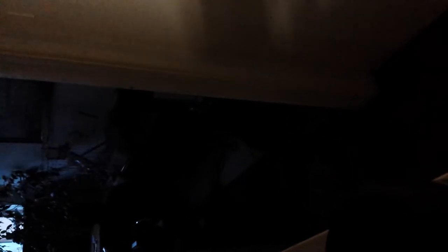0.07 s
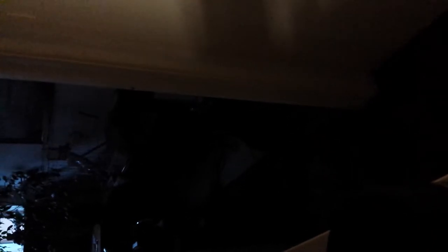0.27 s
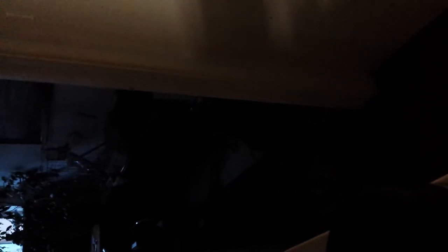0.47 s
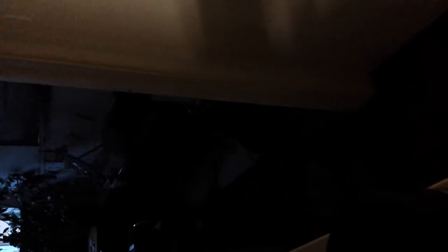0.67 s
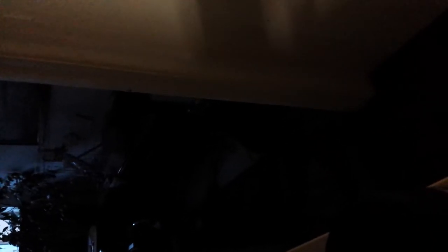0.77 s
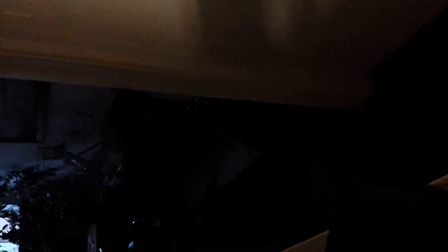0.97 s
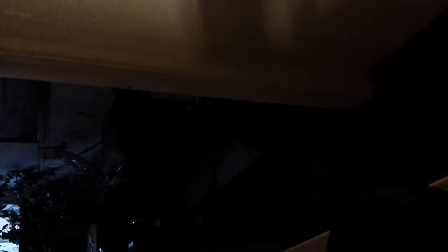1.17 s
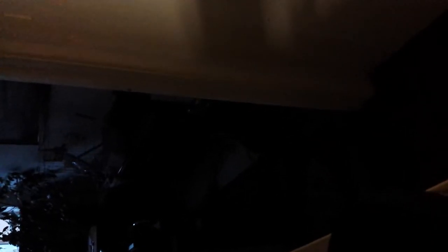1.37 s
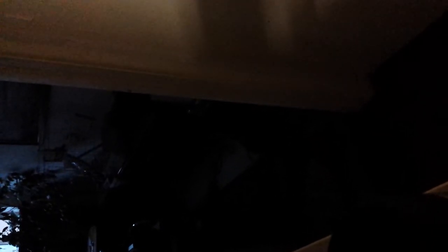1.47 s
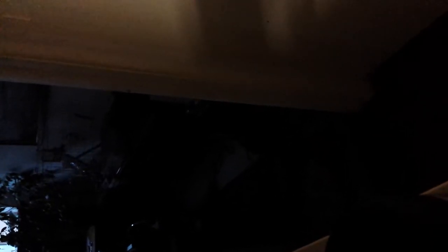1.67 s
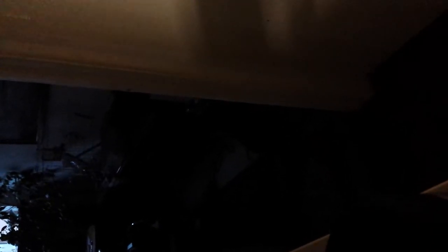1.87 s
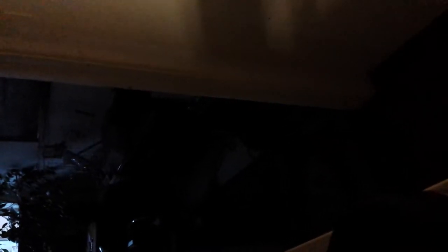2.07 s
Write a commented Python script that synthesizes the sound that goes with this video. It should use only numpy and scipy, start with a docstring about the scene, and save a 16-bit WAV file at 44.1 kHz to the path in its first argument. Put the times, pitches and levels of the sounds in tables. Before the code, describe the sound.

A dog whimpers briefly, whistles thinly through its nose, then whines in a long rising cry

```python
"""Dog whining in a small room

A short whimper, thin nasal whistles, then a long cry: rough at first under the loudest whistle, it sags
in pitch and clears into an almost pure rising tone. Harmonic sines and pulsed noise form the voice,
wavering sines and airy noise the whistles. Wall reflections make the tones flutter; beneath lie
shaped-noise rumble and hiss, a faint hum of two sines and two soft knocks of decaying noise."""
import sys
import numpy as np
from scipy import signal
from scipy.fft import rfft, irfft, next_fast_len
from scipy.io import wavfile

SR = 44100
rng = np.random.default_rng(int(sys.argv[2]) if len(sys.argv) > 2 else 0)


def wrap_up_sound(samples):
    """Save the sound to the file named by the first command line argument, as 16-bit audio."""
    columns = np.atleast_2d(samples).T
    # keep every value between -1 and 1, then stretch to whole-number steps
    tamed = np.clip(columns, -1, 1)
    steps = np.round(tamed * 32767).astype(np.int16)
    wavfile.write(sys.argv[1], SR, steps)


N = 93227  # length [samples]


def from_db(db):
    """Logarithmic level: 20 dB is a factor of ten in amplitude."""
    return 10 ** (np.asarray(db) / 20)


def rms_one(x):
    """Normalization by the root mean square, to rms 1."""
    return x / np.sqrt(np.mean(x ** 2) + 1e-20)


def in_time(rows):
    """Linear interpolation of each column of a time curve at every sample."""
    s, *columns = np.transpose(rows)
    return [np.interp(np.arange(N) / SR, s, c) for c in columns]


def gate(rows):
    """Amplitude window: open from the first to the last row, with linear fades just outside."""
    fade_s = 0.008
    t = np.arange(N) / SR
    inside = np.minimum(t - rows[0][0], rows[-1][0] - t)
    return np.clip(1 + inside / fade_s, 0, 1)


def at_hz(points, hz):
    """Spectral envelope: gain at these frequencies, interpolated in dB over log frequency."""
    f, db = np.transpose(points)
    return from_db(np.interp(np.log(hz + 1), np.log(f), db))


def drift(hz):
    """Low-pass random process: a wander of rms 1 that weakens steeply above this rate."""
    f = np.arange(N + 1) * SR / (2 * N)
    spectrum = rfft(rng.standard_normal(2 * N)) / (1 + (f / hz) ** 2) ** 2
    return rms_one(irfft(spectrum)[:N])


def noise(spectrum, alike):
    """Coloured noise by spectral shaping; mid and side powers set the left-right correlation."""
    size = next_fast_len(N, True)
    gain = at_hz(spectrum, np.fft.rfftfreq(size, 1 / SR))
    white = rng.standard_normal((2, size))
    mid, side = irfft(rfft(white) * gain, size)[:, :N]
    return rms_one(np.sqrt(1 + alike) * mid + np.sqrt(1 - alike) * side * [[1], [-1]])


def pan(x, db):
    """Interaural level difference: left raised and right lowered by db."""
    return x * from_db(db * np.array([[1], [-1]]))


def background():
    """Broadband room noise with a frequency- and amplitude-modulated hum, under slow level curves."""
    # Slow swell of the room noise: (time [s], rumble and hum level [dB], hiss level [dB])
    floor = [(0, -75.5, -73), (.1, -75, -73.5), (.25, -70.5, -63.5), (.38, -72, -72), (.95, -70, -68),
             (1.15, -65.5, -63), (1.27, -70.5, -67), (1.6, -63, -60), (1.95, -61.5, -59),
             (2.11, -61.5, -60)]
    # Spectra of the low and high room noise: (frequency [Hz], level [dB])
    rumble_spectrum = [(25, -10.5), (50, -2.5), (75, -2.5), (105, 3), (150, -3.5), (300, -6), (600, -8.5),
                       (1200, -16.5), (3000, -25.5)]
    hiss_spectrum = [(200, -10), (700, -5), (2000, 0), (4000, 0.5), (8000, -2), (11000, -5), (15500, -1.5)]
    # Hum tones: (frequency [Hz], peak amplitude relative to the rumble's rms [dB])
    hum_tones = [(106, -8), (199, -8)]
    hum_waver_hz, hum_swell = 2.5, 1.08  # rms deviation of pitch [Hz] and of relative amplitude

    rumble_db, hiss_db = in_time(floor)
    hum = 0
    for hz, db in hum_tones:
        phase = 2 * np.pi * np.cumsum(hz + hum_waver_hz * drift(23.7)) / SR
        hum = hum + from_db(db) * np.sin(phase) * (1 + hum_swell * drift(3.2))
    low = noise(rumble_spectrum, alike=0.21) + hum
    return from_db(rumble_db) * low + from_db(hiss_db) * noise(hiss_spectrum, alike=0.0045)


def room(x):
    """Recirculating reflections: each round trip forms a decaying echo series, weaker in the bass."""
    # Round trips between the walls [ms], one row each for left and right
    wall_trips = [
        [11.3, 15.9, 19.7, 22, 38, 35.9],
        [12.7, 17, 19, 24, 18, 33],
    ]
    reflection_db, t60_s = -8.5, 0.29
    bass_db, bass_hz = -17, 840  # further cut of the reflections in the bass
    left_lag_s = 0.0003787

    size = next_fast_len(N + SR, True)
    f = np.fft.rfftfreq(size, 1 / SR)
    wet = from_db(reflection_db + bass_db / (1 + (f / bass_hz) ** 4))
    out = []
    for channel, trips, lag in zip(x, wall_trips, (left_lag_s, 0)):
        walls = 0
        for k, s in enumerate(np.array(trips) / 1000):
            loop = from_db(-60 * s / t60_s) * np.exp(-2j * np.pi * f * s)
            walls = walls + (-1) ** k * loop / (1 - loop)  # geometric series of all later passes
        direct = rfft(channel, size) * np.exp(-2j * np.pi * f * lag)
        out.append(irfft(direct * (1 + wet * walls), size)[:N])
    return np.array(out)


def knocks():
    """Impulsive excitation: abrupt, exponentially decaying bursts of dull noise on the left."""
    # Soft knocks: (onset time [s], level [dB])
    knock_onsets = [(0.892, -59), (1.157, -59.5)]
    # Spectrum of a knock: (frequency [Hz], level [dB])
    knock_spectrum = [(60, -8), (200, 8.5), (500, -7.5), (2400, -9), (4000, -26), (12000, -50)]
    decay_s = 0.0027  # time constant
    t = np.arange(N) / SR
    level = 0
    for s, db in knock_onsets:
        level = level + from_db(db) * (t >= s) * np.exp(-np.abs(t - s) / decay_s)
    return pan(level * noise(knock_spectrum, alike=0.24), db=13.0)


def whistle(rows):
    """A nearly pure tone in turbulent air; unsteadiness modulates its frequency and amplitude."""
    # Spectrum of the air through the nose: (frequency [Hz], level [dB])
    air_spectrum = [(400, -9), (590, 7), (800, -38), (1700, -6.5), (2700, -10), (3800, -11.5), (4750, -1),
                    (5400, -7), (6500, -11.5), (9000, -14), (15000, -53)]
    air_db, air_follows = -63.5, 0.22  # air level under a -45.5 dB whistle; share of its swing in dB
    jitter, flutter_depth, rate_hz = 0.01935, 0.85, 123.6  # rms fractions at full unsteadiness

    hz, db, shaky = in_time(rows)
    pitch = hz * (1 + jitter * shaky * drift(rate_hz))
    phase = 2 * np.pi * np.cumsum(pitch) / SR
    tone = np.sqrt(2) * from_db(db) * np.sin(phase)
    tone = tone * (1 + flutter_depth * shaky * drift(rate_hz))
    air = from_db(air_db + air_follows * (db + 45.5)) * noise(air_spectrum, alike=0.32)
    return gate(rows) * (pan(tone, db=3.5) + air)


def second_tone(rows):
    """Interference of neighbouring tones: a randomly wobbling sine that beats against the voice."""
    jitter = 0.035  # rms fraction of the pitch
    hz, db = in_time(rows)
    phase = 2 * np.pi * np.cumsum(hz * (1 + jitter * drift(94))) / SR
    return gate(rows) * np.sqrt(2) * from_db(db) * np.sin(phase)


def flutter():
    """Amplitude modulation: the product of brief Gaussian dips in the fundamental."""
    # Dips as the cry slides in pitch: (time [s], half width to 1/e depth [s], depth [0-1])
    dips = [(1.489, 0.018, 0.78), (1.626, 0.0046, 0.82), (1.668, 0.0094, 1), (1.717, 0.0063, 0.79),
            (1.742, 0.0045, 1), (1.806, 0.011, 0.87), (1.904, 0.011, 0.7), (2.062, 0.0084, 0.5)]
    t = np.arange(N) / SR
    return np.prod([1 - depth * np.exp(-((t - s) / width) ** 2) for s, width, depth in dips], axis=0)


def voice(rows, count=15):
    """Source-filter voice: vocal-fold harmonics through the throat, with noise pulsed by each cycle."""
    # Lean of the fundamental: (time [s], left gain, opposite on the right [dB])
    lean = [(1.4, -.5), (1.55, -2.5), (1.75, .5), (1.85, -3.5), (1.99, -1.2), (2.06, 5.5)]
    # Throat and nose colour of the overtones: (frequency [Hz], level [dB])
    throat = [(790, 0), (900, -24.5), (1050, -14.5), (1220, -12), (1320, -25.5), (1490, -17.5), (1570, -6),
              (1780, -14), (2150, -18.5), (2400, -41.5), (2620, -16.5), (2850, -60), (3200, -30),
              (4750, -27), (6000, -49), (9000, -82)]
    # Noise of the rough voice, low growl and high rasp: (frequency [Hz], level [dB])
    growl_spectrum = [(290, -50), (360, -1), (480, 14), (620, 11), (780, -2), (1100, -29.5)]
    rasp_spectrum = [(1200, -28), (1480, -7), (1650, 0), (1800, -11), (2120, -0.5), (2400, -14),
                     (2650, -1.5), (3200, -26), (4700, -7), (7000, -21.5), (14000, -53)]
    growl_db, rasp_db = -2.5, -1.5  # relative to the fundamental and overtone level curves
    jitter, shimmer, jitter_hz = 0.064, 0.82, 122  # rms fractions of pitch and amplitude; rate
    waver, waver_hz = 0.0028, 32.0  # rms fraction of pitch; rate
    clear_below, clear_even_db = 0.066, -6.5  # below this roughness the even overtones weaken
    clear_upper_db, upper_hz = -3.5, 1800  # a clear voice also loses its upper overtones
    bead_db, bead_hz = 3, 35  # the overtones flicker

    hz, db, overtone_db, rough = in_time(rows)
    lean_db, = in_time(lean)
    chaos = rough ** 1.47  # jitter, shimmer and noise set in late
    pitch = hz * (1 + jitter * chaos * drift(jitter_hz) + waver * drift(waver_hz))
    phase = 2 * np.pi * np.cumsum(pitch) / SR

    clear = np.clip(2 - 2 * rough / clear_below, 0, 1)
    even, upper = from_db(clear_even_db * clear), from_db(clear_upper_db * clear)
    overtones = 0
    for k in range(2, count):
        gain = at_hz(throat, k * hz) * (1 if k % 2 else even)
        gain = gain * np.where(k * hz > upper_hz, upper, 1)
        overtones = overtones + gain * np.sin(k * phase)
    overtones = overtones * from_db(bead_db * drift(bead_hz))

    puffs = chaos * (1 + 0.5 * np.cos(phase))  # noise swells once a cycle
    growl = from_db(growl_db) * puffs * noise(growl_spectrum, alike=1.0)
    rasp = from_db(rasp_db) * puffs * noise(rasp_spectrum, alike=0.32)
    low = pan(np.sqrt(2) * np.sin(phase) * flutter(), lean_db) + growl
    high = pan(np.sqrt(2) * overtones + rasp, db=2.5)
    sound = gate(rows) * (from_db(db) * low + from_db(overtone_db) * high)
    sound = sound * (1 + shimmer * np.minimum(chaos, 1) * drift(jitter_hz))
    high_pass = signal.butter(4, 313, "high", fs=SR, output="sos")
    return signal.sosfilt(high_pass, sound)


def scene():
    """Superposition: the dog and the knocks reverberate in the room, over its background."""
    # Voice: (time [s], pitch [Hz], fundamental level [dB], overtone level [dB], roughness [0-1])
    whimper = [(.119, 480, -67, -72, 0), (.142, 405.6, -50.5, -55, 0.25), (.165, 400, -44, -54.5, 0.31),
               (.18, 408.5, -61, -56, 0.62), (.205, 459.6, -46.5, -58, 0.65), (.222, 431, -52.5, -72, .9),
               (.25, 402, -59, -70, 0.91), (.28, 391, -69.5, -78, 0.7), (.33, 396, -78, -95, 0.97)]
    cry = [(1.387, 480, -56.5, -61, 0.17), (1.405, 493.6, -36, -44, 0.45), (1.435, 499, -34, -38.5, 0.491),
           (1.47, 503, -40.5, -47.5, 0.56), (1.51, 472, -44.5, -49, 0.454), (1.535, 447.5, -46, -40, 0.43),
           (1.58, 431.8, -41.5, -45.5, 0.295), (1.615, 436.4, -51, -44, 0.4), (1.64, 480.6, -36, -48, 0.34),
           (1.68, 472.8, -41, -36, 0.069), (1.704, 493.3, -29, -43, 0.079), (1.73, 507.6, -34, -36, 0.031),
           (1.775, 510.8, -40, -47, .04), (1.83, 520.1, -40, -44.5, 0.03), (1.93, 537, -41, -50.5, 0.041),
           (1.99, 538, -36.5, -46.5, .025), (2.04, 547, -43, -48.5, 0.029), (2.11, 550, -55.5, -54, 0.018)]
    # Second, higher tones while the voice is rough, one list each: (time [s], pitch [Hz], level [dB])
    tone_curves = [
        [(.125, 490, -64), (.15, 483, -56.5), (.19, 498.4, -52.5), (.212, 596, -57.5), (.235, 595, -58),
         (.29, 590, -70)],
        [(1.405, 594.6, -61), (1.44, 588.6, -41), (1.47, 626.5, -51), (1.50, 609.5, -64), (1.55, 595, -48.5),
         (1.60, 553.5, -54), (1.66, 553, -54.5)],
    ]
    # Nasal whistles, one list each: (time [s], pitch [Hz], level [dB], unsteadiness [0-1])
    whistle_curves = [
        [(.325, 5150, -98, 0.4), (.35, 5270, -70.5, 0.75), (.43, 5320, -107, 0.2)],
        [(.45, 5510, -77, .2), (.49, 5504, -65, 0.05), (.525, 5430, -64.5, 0.65), (.59, 5350, -83, 0.3),
         (.65, 5370, -80.5, 0.12), (.72, 5340, -67, 0.18), (.78, 5255, -79, 0.46), (.96, 5270, -78, 0.74)],
        [(.99, 5260, -78, 0.26), (1.06, 5248, -55, 0.09), (1.13, 5235, -53.5, 0.21), (1.19, 5200, -76, 0.32),
         (1.30, 5260, -71, 0.42)],
        [(1.30, 5090, -70, 0.24), (1.358, 5096, -43.5, 0.07), (1.39, 5096, -44.5, 0.15),
         (1.456, 5093, -44.5, 0.04), (1.472, 4962, -49, 0.5), (1.515, 4704, -45, 0.7), (1.585, 4660, -65, 0.47),
         (1.64, 4580, -51.5, 0.37), (1.725, 4525, -60, 0.03), (1.76, 4530, -86, 0), (1.82, 4700, -74, 0.2)],
    ]

    dog = voice(whimper) + voice(cry)
    dog = dog + sum(second_tone(rows) for rows in tone_curves)
    dog = dog + sum(whistle(rows) for rows in whistle_curves)
    return room(dog + knocks()) + background()


def record(dry):
    """Linear-phase low-pass filtering: the top is cut steeply at 15550 Hz."""
    low_pass = signal.firwin(401, 15550, fs=SR, window="blackman")
    return signal.fftconvolve(dry, low_pass[None], "same", axes=1)


dry = scene()
out = record(dry)
wrap_up_sound(out)
```